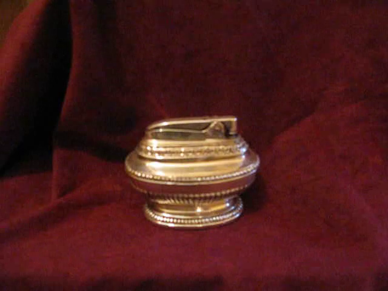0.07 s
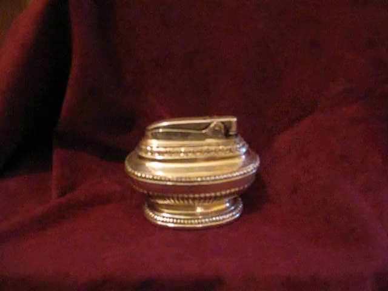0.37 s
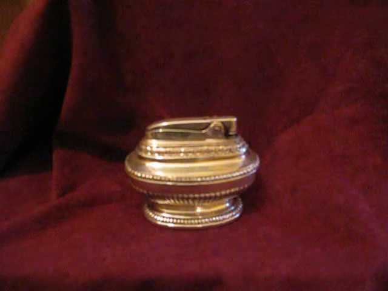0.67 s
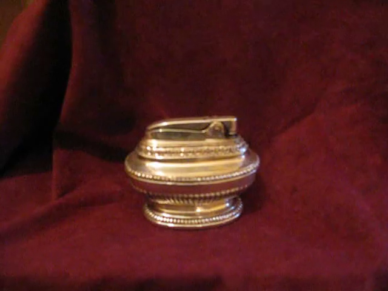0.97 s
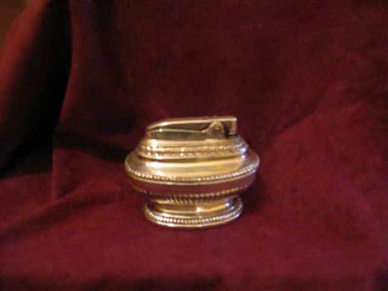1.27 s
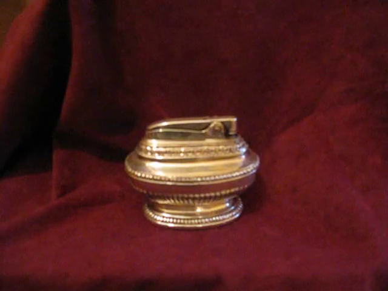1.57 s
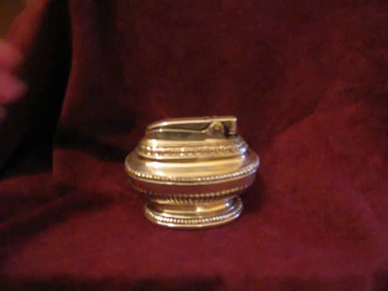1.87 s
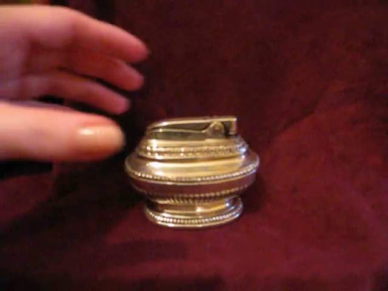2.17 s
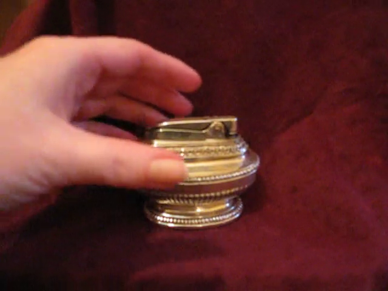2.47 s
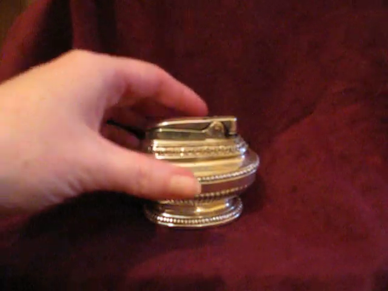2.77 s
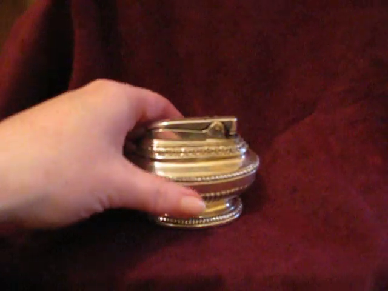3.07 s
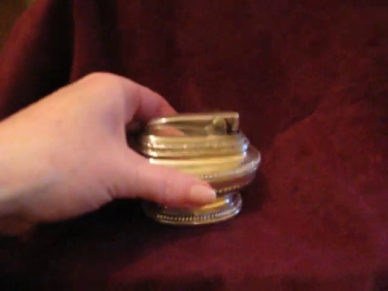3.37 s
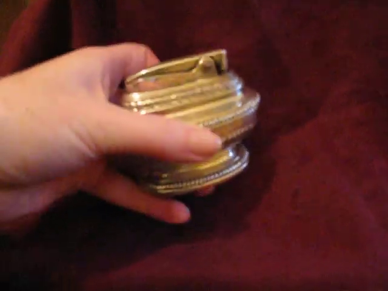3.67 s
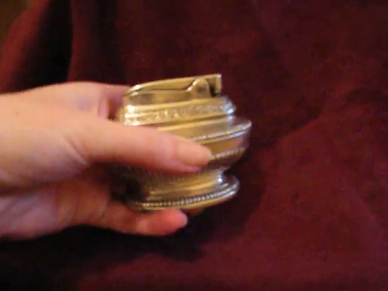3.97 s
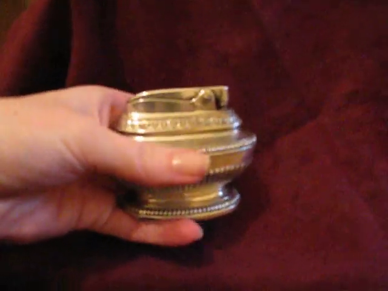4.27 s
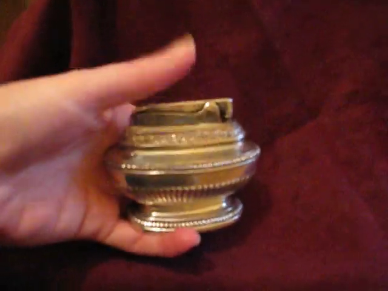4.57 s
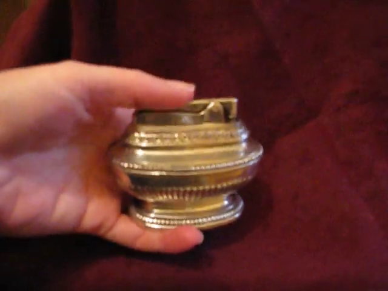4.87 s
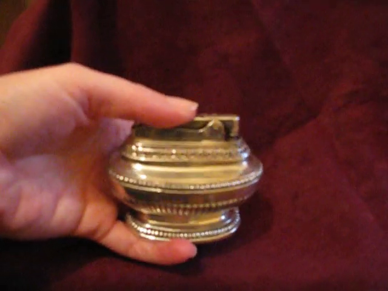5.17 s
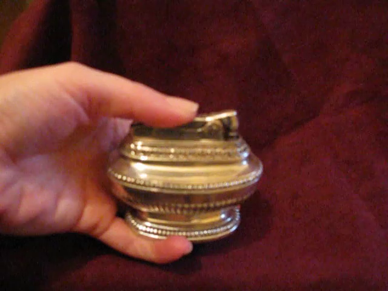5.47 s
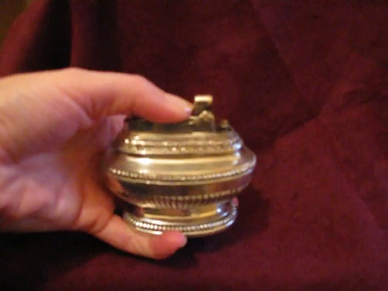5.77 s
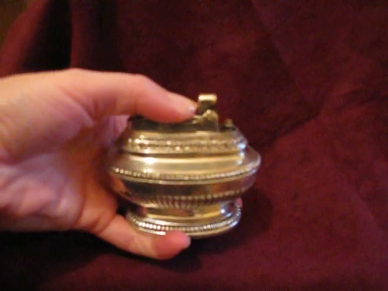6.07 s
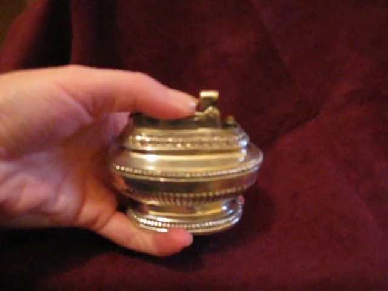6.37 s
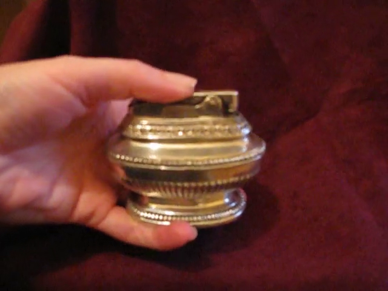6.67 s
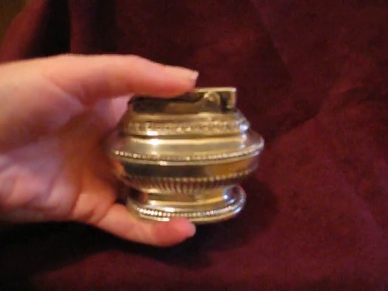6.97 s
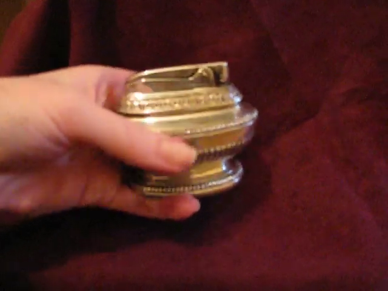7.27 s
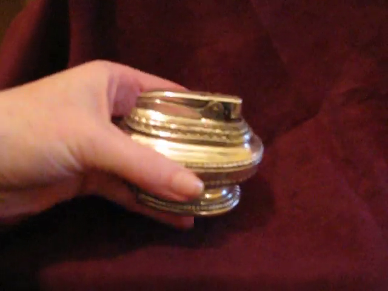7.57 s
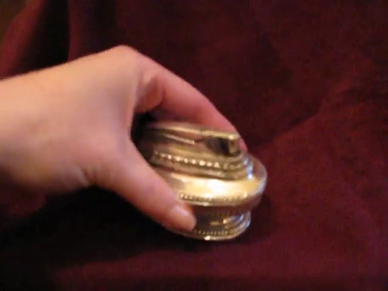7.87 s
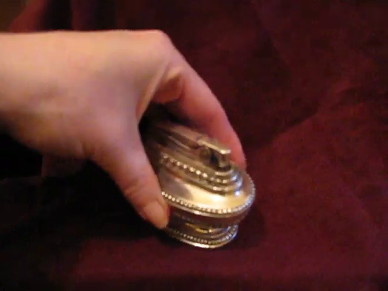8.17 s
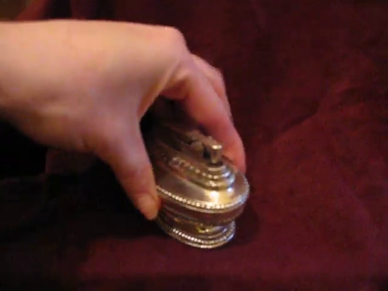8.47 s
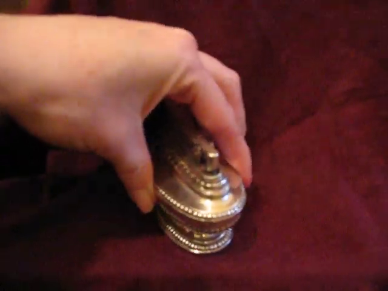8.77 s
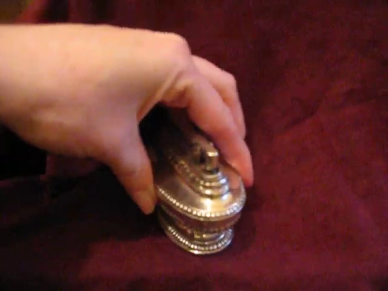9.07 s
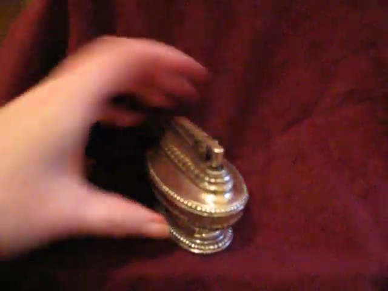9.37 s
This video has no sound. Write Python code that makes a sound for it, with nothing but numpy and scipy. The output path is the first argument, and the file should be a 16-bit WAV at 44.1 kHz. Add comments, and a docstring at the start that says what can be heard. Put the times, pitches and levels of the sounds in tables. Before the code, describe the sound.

A short plastic button knock sounds right at the microphone. In a quiet room with faint hiss and appliance hum, fingers tap and rub a heavy metal lighter and lift it off velvet with a soft rustle. It snaps open with a loud, sharp click and a brief ring, then shuts a second later with a weaker click. Faint rustles and finger rubs follow as it is set down.

```python
"""A heavy metal lighter is lifted off velvet, snapped open, let shut and set down in a quiet room.
Its lever and cap hit their stops, so the case clatters and the cap rings; the wheel scrapes the flint.
Fingers stick and slip on the ribbed case, the cloth rustles and an appliance hums.
A camera's button knocks at the start. The camera's automatic volume dips under each loud snap,
so the room's echo swells up behind it."""
import sys
import numpy as np
from scipy import signal
from scipy.fft import rfft, irfft
from scipy.io import wavfile

SR = 44100
rng = np.random.default_rng(int(sys.argv[2]) if len(sys.argv) > 2 else 0)


def log_audio(samples):
    """Write samples as a 16-bit WAV file to the path given in sys.argv[1]."""
    # one column per channel
    frames = np.atleast_2d(samples).T
    # limit to full scale, then quantise
    limited = np.clip(frames, -1, 1)
    pcm = np.round(limited * 32767).astype(np.int16)
    wavfile.write(sys.argv[1], SR, pcm)


N = 424683
TIME = np.arange(N) / SR


def from_db(db):
    return 10 ** (np.asarray(db) / 20)


def unit_power(x):
    return x / np.sqrt(np.mean(x ** 2) + 1e-20)


def at_pitch(table, hz):
    """Read between the rows of a (pitch, value) table."""
    pitches, values = np.transpose(table)
    return np.interp(np.log(hz), np.log(pitches), values)


def add(track, start_s, sound):
    """Lay a sound into a track."""
    i = int(np.clip(round(start_s * SR), 0, N - 1))
    track[i:i + len(sound)] += sound[:N - i]


def drift(turns_per_s):
    """A random wander around zero, about 1 in size."""
    points = rng.standard_normal(int(N / SR * turns_per_s) + 2)
    return unit_power(np.interp(TIME * turns_per_s, np.arange(len(points)), points))


def colour(x, tone, tilt_db=0, tilt_from_hz=2970, size=4096):
    """Filter a sound by a tone table, tilting the treble by tilt_db per octave; hiss keeps its power."""
    hz = np.maximum(np.arange(size // 2 + 1) * SR / size, 1)
    octaves_up = np.log2(np.maximum(hz / tilt_from_hz, 1))
    gain = unit_power(from_db(at_pitch(tone, hz) + tilt_db * octaves_up))
    # Build the filter so that it rings only after a hit, never before.
    cepstrum = irfft(np.log(gain))
    one_sided = np.r_[cepstrum[0], 2 * cepstrum[1:size // 2]]
    return signal.fftconvolve(x, irfft(np.exp(rfft(one_sided, size))))[:len(x)]


def ring(hz, fade_s, size=16384):
    """One struck note. Here and below, fade_s is the time to die away by 60 dB."""
    return np.sin(2 * np.pi * hz * TIME[:size]) * from_db(-60 * TIME[:size] / fade_s)


def clatter(fade_s, size=4096):
    """A short, dense burst, about equally strong at every pitch."""
    fade = from_db(-60 * TIME[:size] / fade_s)
    phases = np.angle(rfft(rng.standard_normal(size) * fade))
    burst = irfft(np.exp(1j * phases)) * fade ** (1 / 4)
    return burst * np.linalg.norm(fade) / np.linalg.norm(burst)


def swell(middle_s, level_db, length_s, edge_db=-9):
    """The loudness of one hand stroke: it rises to its middle, then falls."""
    return from_db(level_db + np.maximum(edge_db * np.abs(TIME - middle_s) / (length_s / 2), -100))


# The tone of the room's hiss: pitch_hz, gain_db
HISS_TONE = [(20, -7.5), (60, -3.5), (140, -4), (180, 2.5), (330, 1.5), (440, 0), (660, -0.5), (850, -2.5),
             (1600, -5), (2500, -6), (3100, -9.5), (6000, -12), (10000, -16), (15800, -21.5)]
# An appliance's hum and thin electric whine: pitch_hz, level_db
HUM_NOTES = [(120, -72), (198.8, -56), (240.2, -65.5), (297, -71), (319, -65.5), (399, -75), (618, -67.5),
             (638, -70.5), (662, -67.5), (711, -73.5), (2488, -75.5), (5276, -76), (5335, -80), (5453, -76),
             (5512, -74), (5749, -79.5), (7875, -80), (9125, -75.5)]


def hiss_and_hum(hiss_db=-50.5, flutter_db=1.5, wander_hz=1.175):
    """An appliance hums, wavering a little, over an even hiss."""
    out = from_db(hiss_db) * colour(rng.standard_normal(N), HISS_TONE)
    for hz, level_db in HUM_NOTES:
        phase = 2 * np.pi * np.cumsum(hz + wander_hz * drift(9)) / SR
        out += np.sqrt(2) * from_db(level_db + flutter_db * drift(7)) * np.sin(phase)
    return out


def plastic_ping(hz, fade_s, width_octaves, grit_db=-15):
    """Knocked plastic gives a short, gritty ping around its own pitch."""
    knock = ring(hz, fade_s, size=4096) + from_db(grit_db) * clatter(4.8 * fade_s)
    edges_hz = np.clip(hz * 2 ** (np.array([-.5, .5]) * width_octaves), 20, .45 * SR)
    return signal.sosfilt(signal.butter(2, edges_hz, "band", fs=SR, output="sos"), knock)


# The notes of the camera's plastic shell: pitch_hz, level_db, fade_s
SHELL_NOTES = [(575, -8.5, .005), (1050, 4.5, 0.004), (1350, -14.5, 0.016), (3450, -20, .006),
               (4950, -28, 0.014), (6200, -21, 0.0058), (9400, -39, 0.0041)]
# Small plastic parts ticking: start_s, level_db, pitch_hz
PLASTIC_TICKS = [(0.1353, -26, 4400), (0.143, -20.5, 6200), (.1488, -21, 5760), (.149, -32, 13100),
                 (.1573, -12, 1210), (.2149, -25, 2480), (0.2146, -21.5, 5660), (9.5594, -26.5, 1080),
                 (9.566, -30, 1700)]


def camera(button_s=.0397):
    """The button springs back against the shell, then small parts tick under the fingers."""
    out = np.zeros(N)
    for hz, level_db, fade_s in SHELL_NOTES:
        add(out, button_s, from_db(level_db) * plastic_ping(hz, fade_s, width_octaves=1.87))
    for start_s, level_db, hz in PLASTIC_TICKS:
        add(out, start_s, from_db(level_db) * plastic_ping(hz, fade_s=0.0039, width_octaves=1.6))
    return out


def grains(per_s, spread_db):
    """Rubbing is made of tiny slips of uneven size at random moments."""
    sizes = from_db(spread_db * np.minimum(rng.exponential(1, N), 4))
    signs = rng.choice([-1, 1], N)
    return unit_power(sizes * signs * (rng.random(N) < per_s / SR))


# Strokes over the velvet: middle_s, level_db, length_s
VELVET_STROKES = [(1.03, -61, .14), (2.956, -55.5, 0.18), (3.13, -56, 0.12), (3.426, -54, 0.31),
                  (3.635, -52, .18), (4.03, -56, .09), (7.48, -59, .14), (7.66, -53.5, .16),
                  (8.103, -53.5, 0.4), (8.488, -52.5, 0.33), (8.72, -56.5, 0.36), (9.283, -54.5, .14),
                  (9.48, -56.5, 0.45)]
# The tone of the rustle: pitch_hz, gain_db
VELVET_TONE = [(150, -5), (600, 4.5), (2400, 4), (4000, 0), (8000, -2.5), (12000, -1.5), (16000, -9)]


def velvet_rustle():
    """Hand and lighter brush the cloth with a soft, fine rustle."""
    loudness = np.sqrt(sum(swell(*stroke) ** 2 for stroke in VELVET_STROKES))
    return colour(loudness * grains(7000, spread_db=4.5), VELVET_TONE)


def strike(fade_s, shiver_db=-19, shiver_fade_s=0.04):
    """A hard crack, then the case shivers on until the hand has stilled it."""
    return clatter(fade_s) + from_db(shiver_db) * clatter(shiver_fade_s)


# Fingers tap the case as they take hold: start_s, level_db, pitch_hz
FINGER_TAPS = [(2.406, -44, 3100), (3.089, -41.5, 3130), (3.300, -41.5, 2890), (3.627, -40.5, 2350),
               (9.068, -46, 2400)]
# Lever and cap hit their stops, opening and then shutting (cap_db and part_db add to level_db):
# start_s, level_db, fade_s, tilt_db_per_octave, cap_db, part_pitch_hz, part_db
SNAP_HITS = [(5.4623, -29.5, 0.0095, -12, -45, 3200, 1), (5.4624, -46, 0.0062, -3, -45, 4020, 12),
             (5.5803, -32, .02, -3, -27, 7800, -8), (5.5828, -34, 0.012, -10, -8, 2930, 13.5),
             (5.5862, -5, 0.0075, 0.5, -17.5, 5570, -7), (5.6, -14, 0.0043, 3.5, -29, 5170, -9),
             (6.4877, -36.5, .009, -10, -13, 4550, -1), (6.5274, -25, .005, -5, -24, 2920, 6),
             (6.53, -7.5, .008, -0.9, -16, 2950, -5.5)]
# The notes the cap rings with: pitch_hz, level_db, fade_s
CAP_NOTES = [(2970, -12, 0.12), (2970, 7.5, 0.039), (3010, -8.5, 0.18), (3480, -13, .1), (3800, -17, .11)]
# The tone of the metal case: pitch_hz, gain_db
CASE_TONE = [(200, -17), (800, -17), (1600, -16), (2300, -19.5), (2950, 0.5), (4100, -5.5), (5000, 1),
             (6300, 0.5), (7300, -1.5), (8900, -4.5), (10600, 3), (12400, -3.5), (13700, 6), (15800, -11)]
# The wheel scrapes the flint as the lever hits its stop: start_s, level_db, fade_s
FLINT_SCRAPES = [(5.5868, 4, 0.011)]
# The tone of that scrape: pitch_hz, gain_db
FLINT_TONE = [(200, -45), (1500, -28), (2400, -15), (3000, -1), (4100, -11.5), (5000, -1), (5900, -11),
              (6800, -4), (7900, 0.5), (9500, -1.5), (11500, -2), (13500, -2), (15800, -9)]


def lighter(tap_fade_s=0.014, tap_tilt_db=-8, tap_cap_db=-18, tap_part_db=-1):
    """Each hit rattles the case, pings the struck part and rings the cap; the flint scrapes once."""
    out = np.zeros(N)
    cap_ring = sum((-1) ** k * from_db(level_db) * ring(hz, fade_s)
                   for k, (hz, level_db, fade_s) in enumerate(CAP_NOTES))
    taps = [(start_s, level_db, tap_fade_s, tap_tilt_db, tap_cap_db, hz, tap_part_db)
            for start_s, level_db, hz in FINGER_TAPS]
    for start_s, level_db, fade_s, tilt_db, cap_db, part_hz, part_db in taps + SNAP_HITS:
        add(out, start_s, from_db(level_db) * colour(strike(fade_s), CASE_TONE, tilt_db))
        add(out, start_s, from_db(level_db + part_db) * ring(part_hz, 1.23 * fade_s))
        add(out, start_s, from_db(level_db + cap_db) * cap_ring)
    for start_s, level_db, fade_s in FLINT_SCRAPES:
        add(out, start_s, from_db(level_db) * colour(strike(fade_s), FLINT_TONE))
    return out


# Fingers slide over the ribbed case: middle_s, level_db, length_s
FINGER_SLIDES = [(2.948, -50, 0.08), (3.12, -56, .25), (3.61, -62, .12), (8.93, -62, .14),
                 (9.125, -55, .15), (9.275, -50, .15)]
# The sharpest catches of skin on the ribs: start_s, level_db
SKIN_CATCHES = [(2.6204, -42), (2.6743, -37), (2.8469, -37), (2.8674, -43), (3.0704, -39), (3.1274, -34),
                (8.3923, -46), (8.9216, -41), (8.9555, -39), (9.3546, -38)]
# The tone of skin on metal: pitch_hz, gain_db
SKIN_TONE = [(1000, -30), (6000, -8), (10000, -6), (12000, -1), (13500, 4), (15000, -1), (16000, -11)]


def finger_rub(slips_per_s=70, slip_fall_db=22, slide_gain_db=-3, catch_gain_db=-6.5):
    """Skin sticks and slips on the ribbed metal with a high crackle."""
    pressure = sum(swell(*stroke) for stroke in FINGER_SLIDES)
    slip_rate = slips_per_s * np.exp(.35 * drift(60))
    slip_progress = np.cumsum(slip_rate) / SR % 1   # runs from 0 to 1 during each slip
    judder = from_db(0.5 * drift(130) - slip_fall_db * slip_progress)
    crackle = pressure * from_db(slide_gain_db) * unit_power(judder * grains(2400, spread_db=3.5))
    for start_s, level_db in SKIN_CATCHES:
        add(crackle, start_s, from_db(level_db + catch_gain_db) * clatter(fade_s=0.019))
    return colour(crackle, SKIN_TONE)


def lever_groan(middle_s=5.08, length_s=0.121, level_db=-44.5, from_hz=360, to_hz=308, sink_s=0.039):
    """The thumb presses the lever: a faint, shaky groan whose pitch sinks and settles."""
    start_s = middle_s - length_s / 2
    hz = np.interp(TIME, [start_s, start_s + sink_s], [from_hz, to_hz])
    phase = 2 * np.pi * np.cumsum(hz * (1 + 0.036 * drift(90))) / SR
    weak_octave = from_db(-11) * np.sin(2 * phase)
    return swell(middle_s, level_db, length_s) * (np.sin(phase) + weak_octave)


# The opening thud, then the quieter, higher shutting one: start_s, level_db, tilt_db_per_octave
SNAP_THUDS = [(5.5866, -16.5, 0), (6.5299, -37.5, 4)]
# The low notes of a thud: pitch_hz, level_db, fade_s
THUD_NOTES = [(70, -0.5, 0.0036), (477, -8.5, 0.0069), (884, 6.5, 0.0038)]


def snap_thud():
    """A dull, low thud sounds under each loud, overloaded snap."""
    out = np.zeros(N)
    lowest_hz = THUD_NOTES[0][0]
    for start_s, thud_db, tilt_db in SNAP_THUDS:
        for k, (hz, level_db, fade_s) in enumerate(THUD_NOTES):
            note = ring(hz, fade_s)
            gain = from_db(thud_db + level_db + tilt_db * np.log2(hz / lowest_hz))
            add(out, start_s, (-1) ** k * gain * note / np.max(note))
    return out


# How long the room echoes: pitch_hz, fade_s
ECHO_FADES = [(300, 0.21), (3000, 0.43), (5000, 0.38), (8500, 0.41), (12000, 0.32), (16000, 0.29)]


def room_echo(x, level_db=-10.5, gap_s=0.0017, build_s=0.008, bands=20, size=32768):
    """Echoes build up after a short gap and last longest near 3 kHz; lows and top treble die sooner."""
    t = TIME[:size]
    hz = np.arange(size // 2 + 1) * SR / size
    edges_hz = np.linspace(0, SR / 2, bands + 1)
    noise_spectrum = rfft(rng.standard_normal(size))
    tail = np.zeros(size)
    for low, high in zip(edges_hz, edges_hz[1:]):
        band = irfft(noise_spectrum * (hz >= low) * (hz < high))
        tail += band * from_db(-60 * t / at_pitch(ECHO_FADES, (low + high) / 2))
    tail *= 1 - np.exp(-np.maximum(t - gap_s, 0) / build_s)
    return from_db(level_db) * signal.fftconvolve(x, tail / np.linalg.norm(tail))[:N]


def scene():
    """One microphone, the same in both ears; the camera is too close to it to echo."""
    handling = lighter() + finger_rub() + velvet_rustle()
    mono = handling + room_echo(handling) + snap_thud() + lever_groan() + camera() + hiss_and_hum()
    return np.array([mono, mono])


def cut_treble(x, cutoff_hz=15850):
    """A steep filter takes away the very highest pitches."""
    return signal.oaconvolve(x, signal.firwin(255, cutoff_hz, fs=SR)[None], mode="same", axes=1)


def smooth(x, lag_s):
    """Follow a signal a little late, evening out quick changes."""
    carry = np.exp(-1 / (lag_s * SR))
    return signal.lfilter([1 - carry], [1, -carry], x)


def automatic_volume(x, limit_db=-12, recover_db_per_s=150, sense_s=0.0016, react_s=0.00046):
    """Loud peaks pull the volume down a moment late; it climbs back at a steady rate."""
    awake = TIME > .1
    level_db = 10 * np.log10(smooth(awake * x[0] ** 2, sense_s) + 1e-12)
    excess_db = np.maximum(level_db - limit_db, 0)
    climb_db = recover_db_per_s * TIME
    dip_db = np.maximum.accumulate(excess_db + climb_db) - climb_db
    return x * from_db(-smooth(dip_db, react_s))


def record(dry, switch_on_s=.038, ceiling=.71):
    """The microphone switches on, the volume dips at each snap and the first peaks are squashed."""
    heard = cut_treble(dry * (TIME > switch_on_s))
    squashed = ceiling * np.tanh(automatic_volume(heard) / ceiling)
    return cut_treble(squashed)


dry = scene()
out = record(dry)
log_audio(out)
```